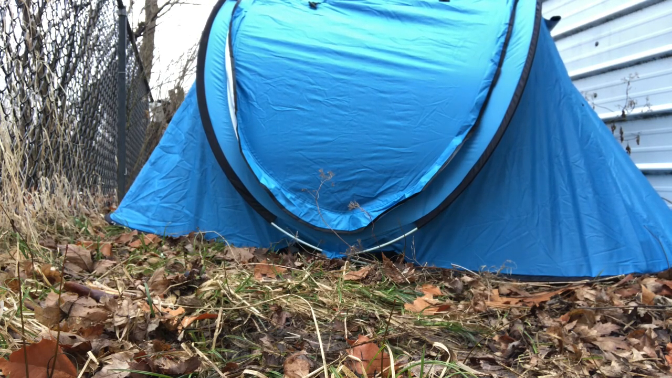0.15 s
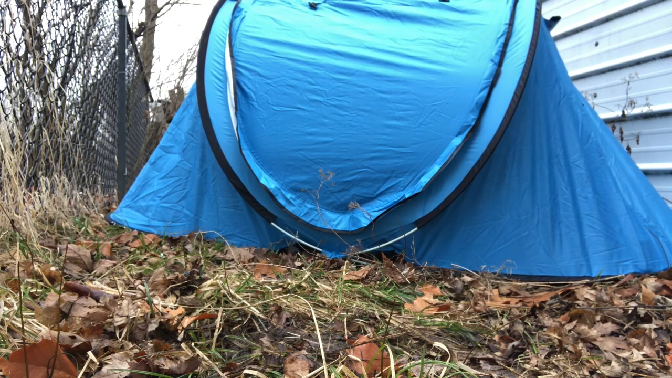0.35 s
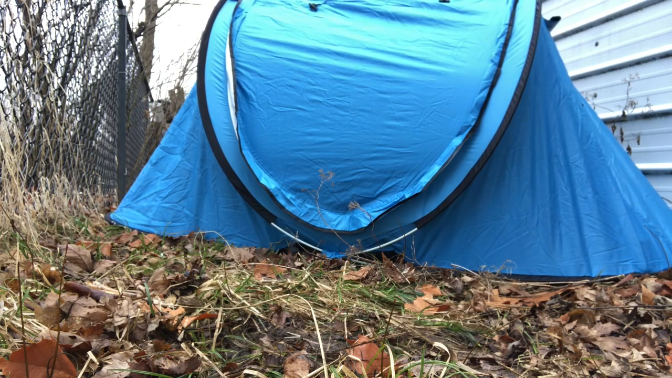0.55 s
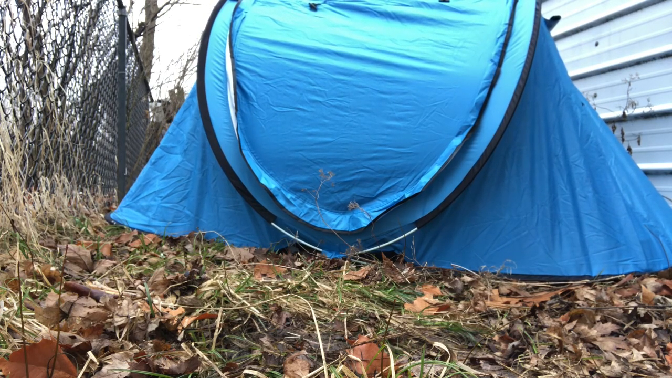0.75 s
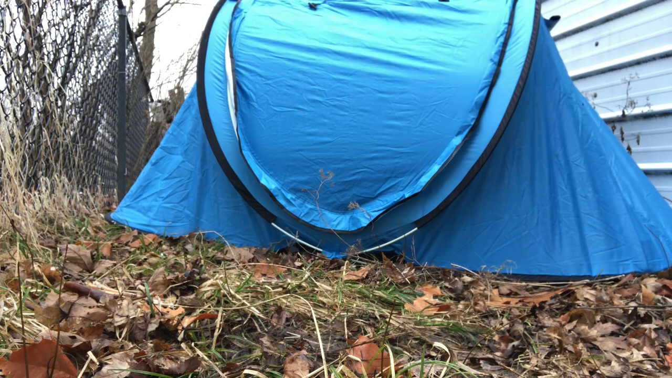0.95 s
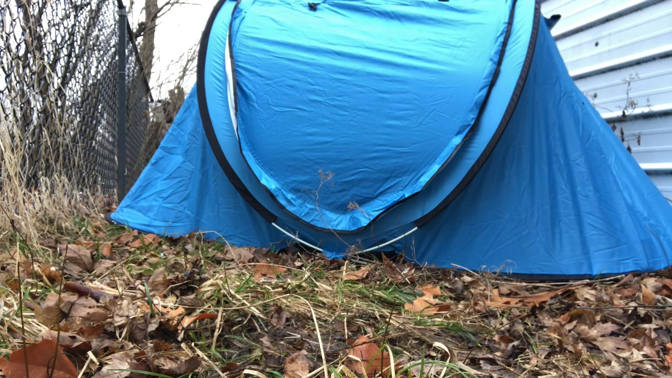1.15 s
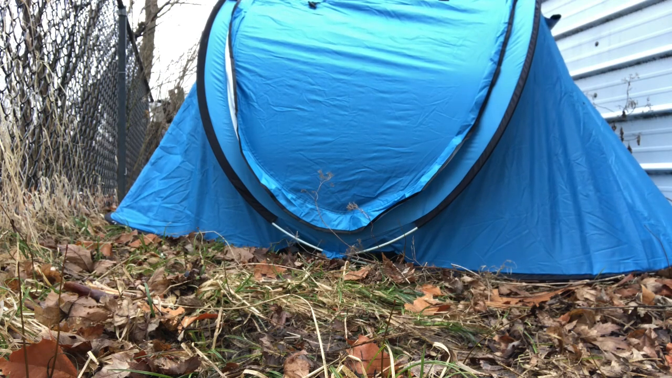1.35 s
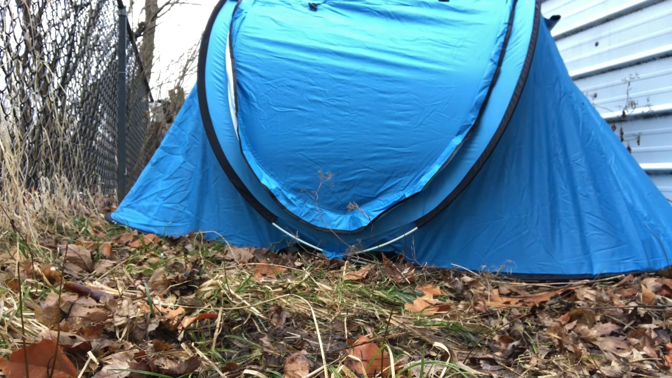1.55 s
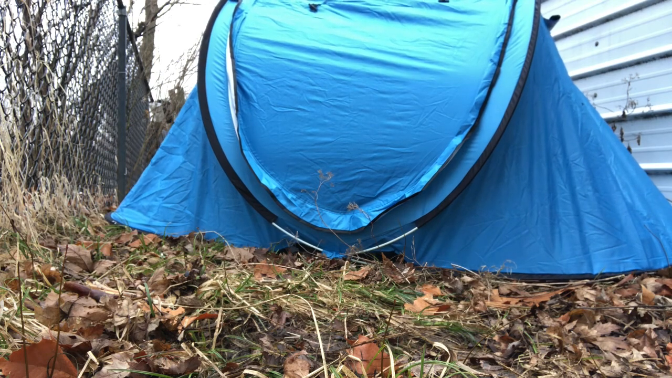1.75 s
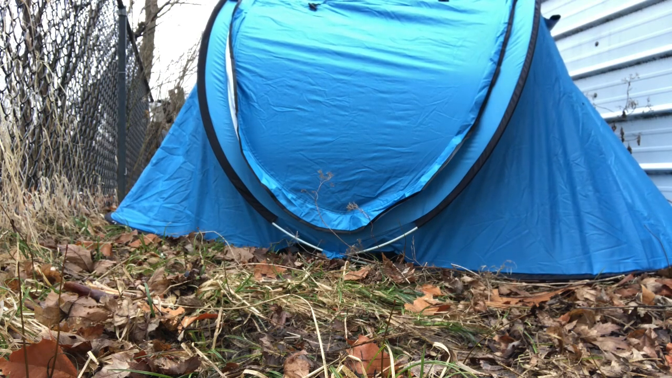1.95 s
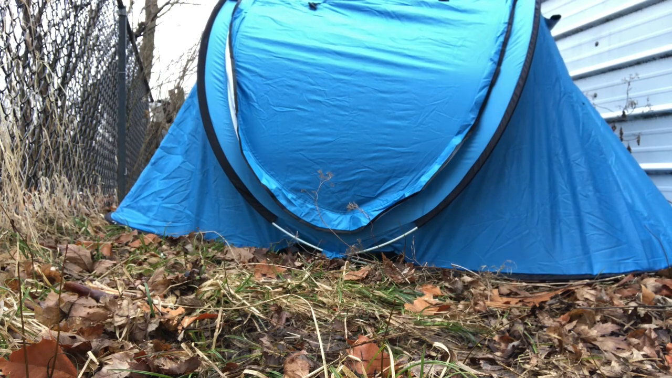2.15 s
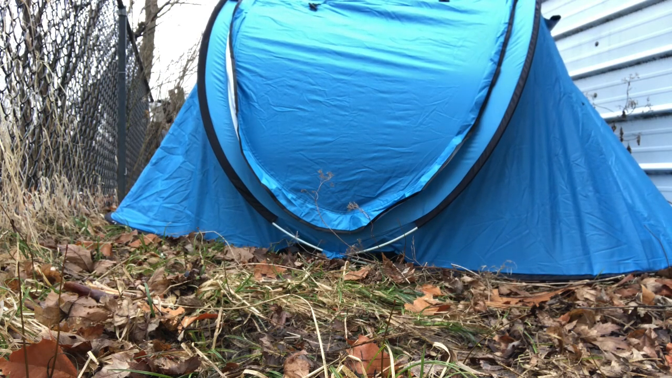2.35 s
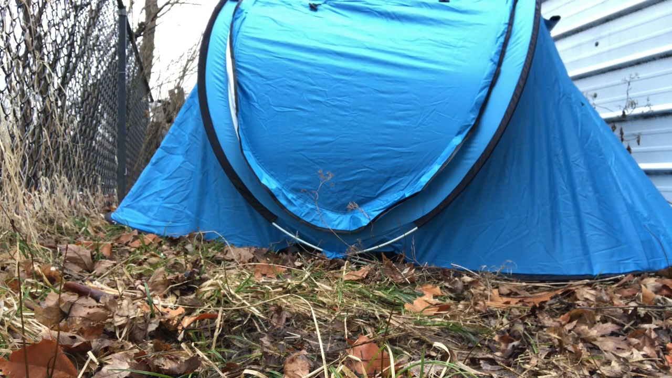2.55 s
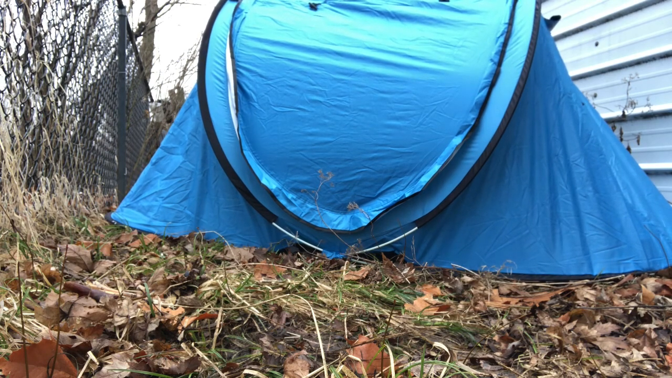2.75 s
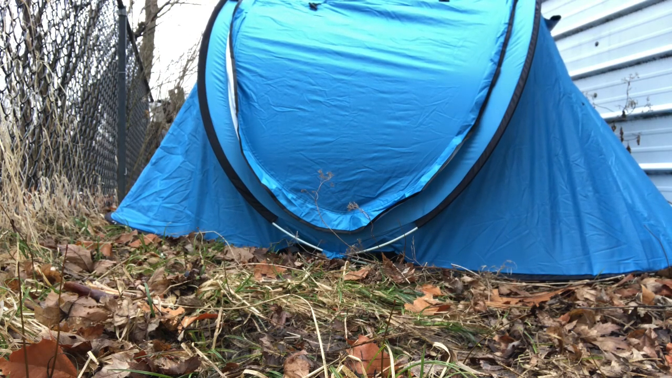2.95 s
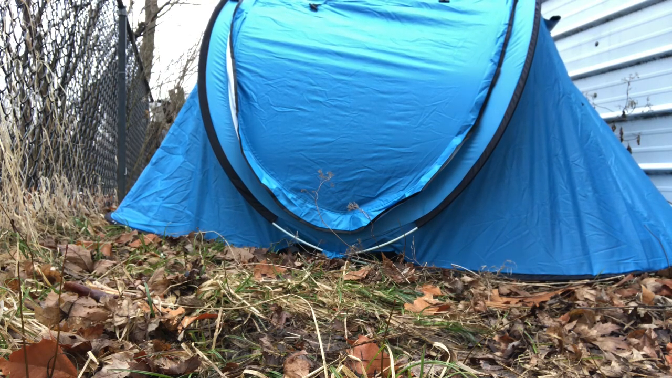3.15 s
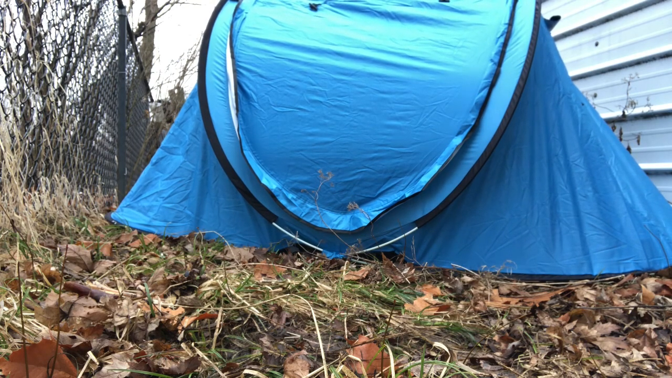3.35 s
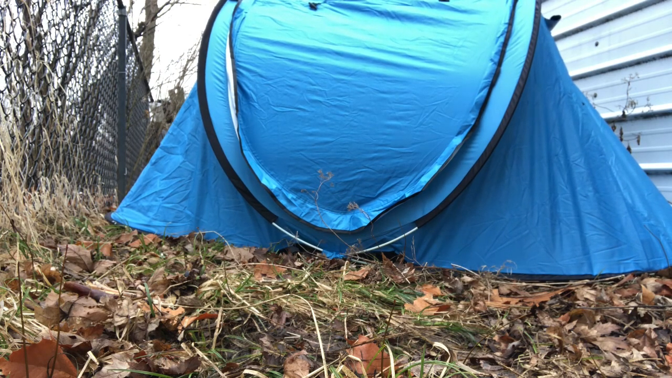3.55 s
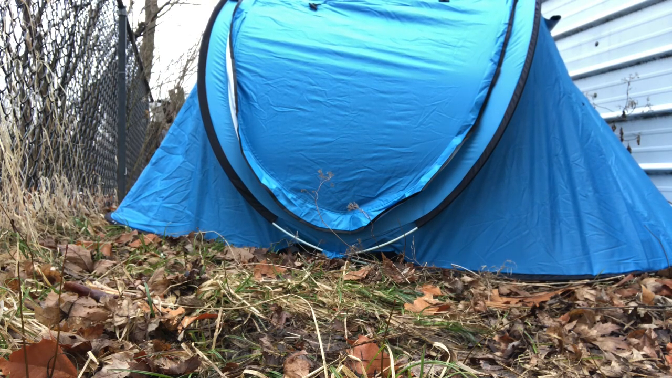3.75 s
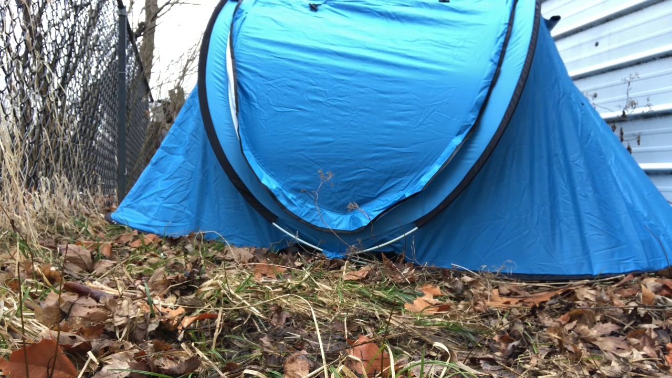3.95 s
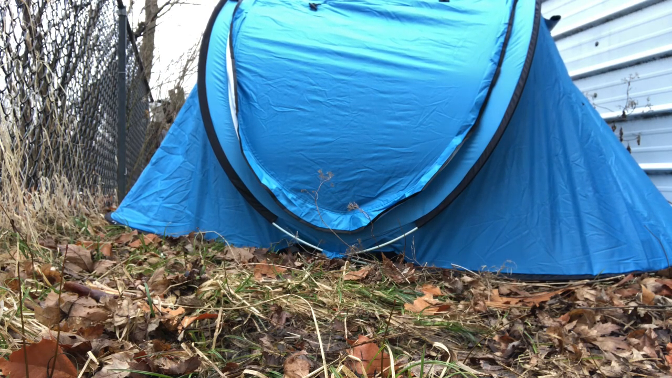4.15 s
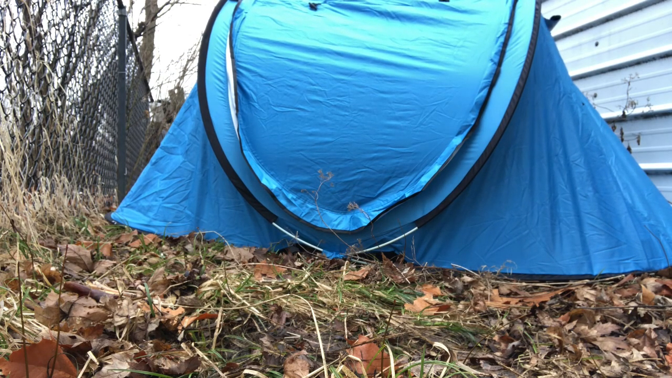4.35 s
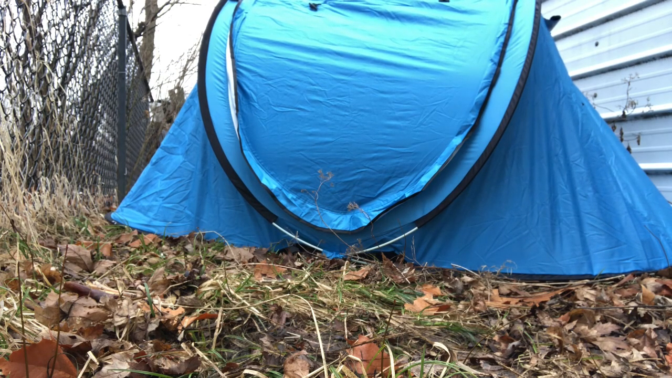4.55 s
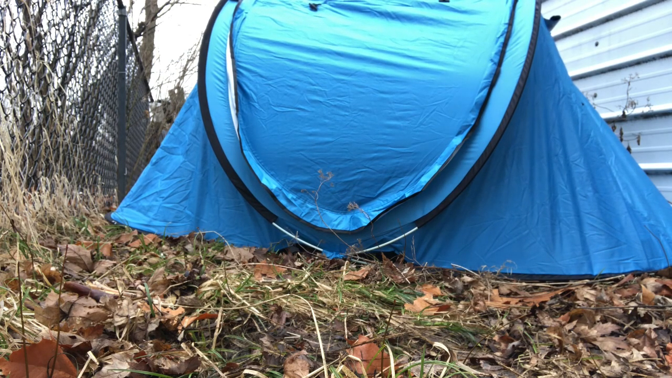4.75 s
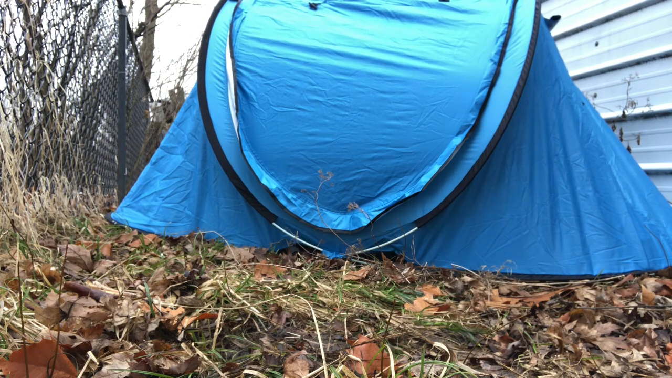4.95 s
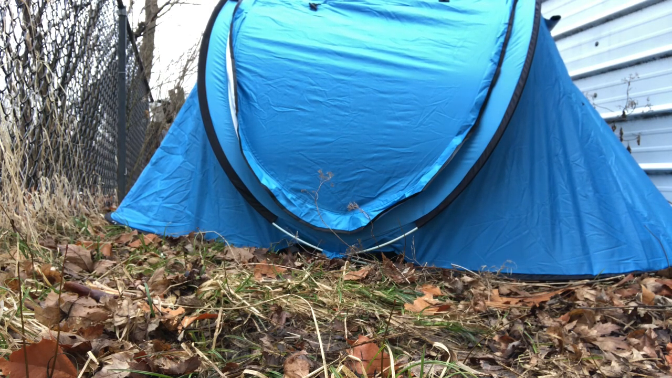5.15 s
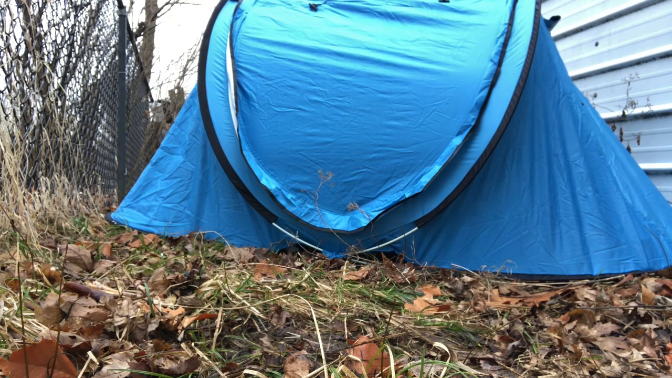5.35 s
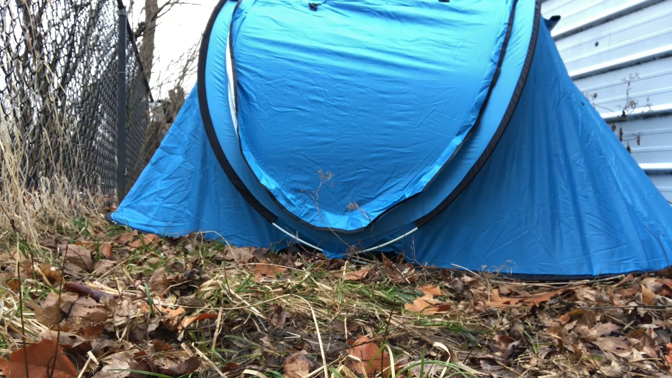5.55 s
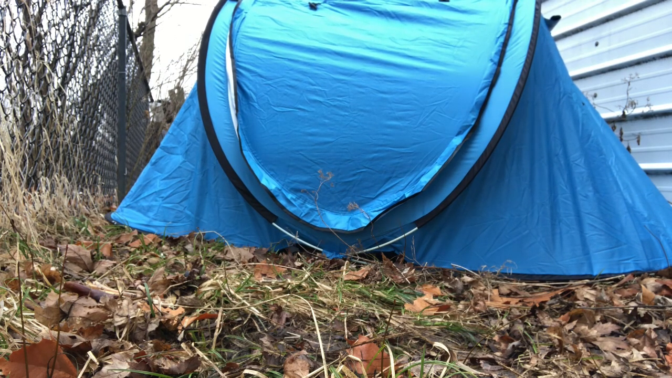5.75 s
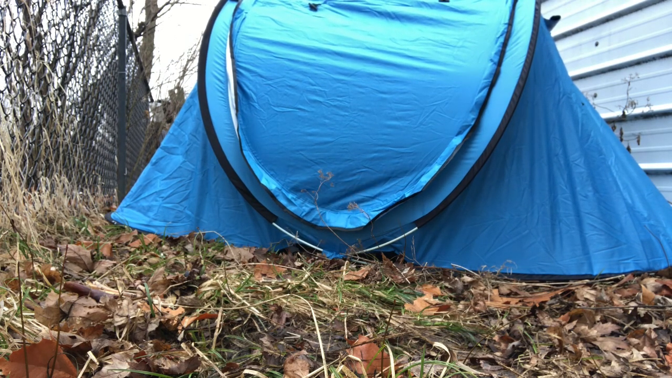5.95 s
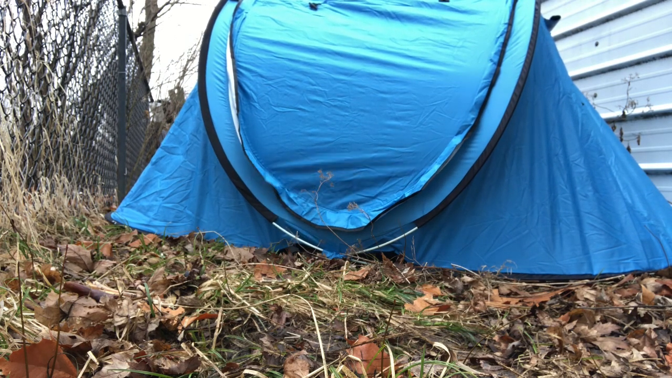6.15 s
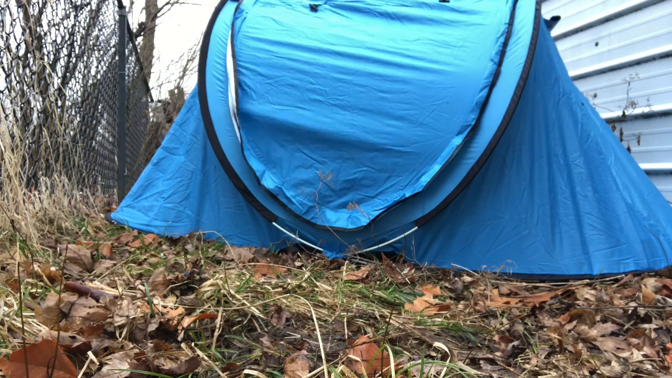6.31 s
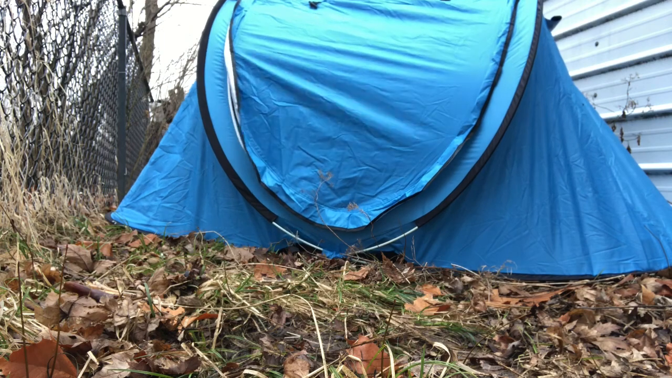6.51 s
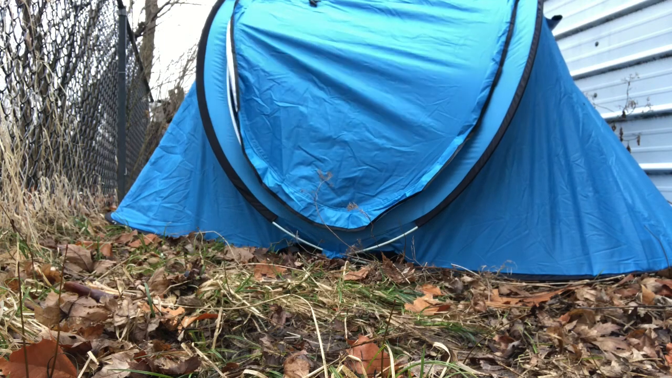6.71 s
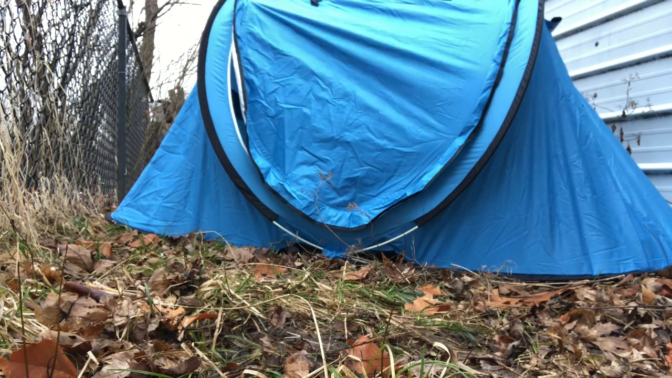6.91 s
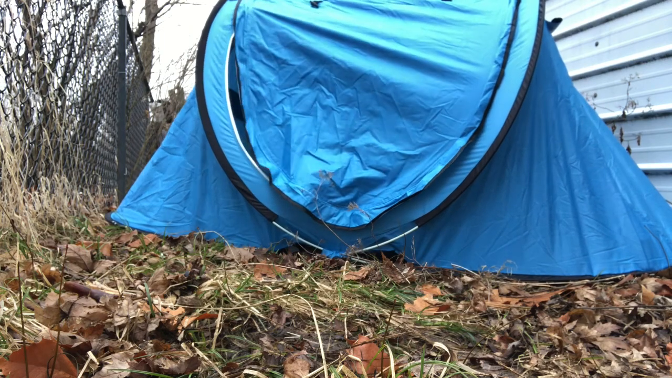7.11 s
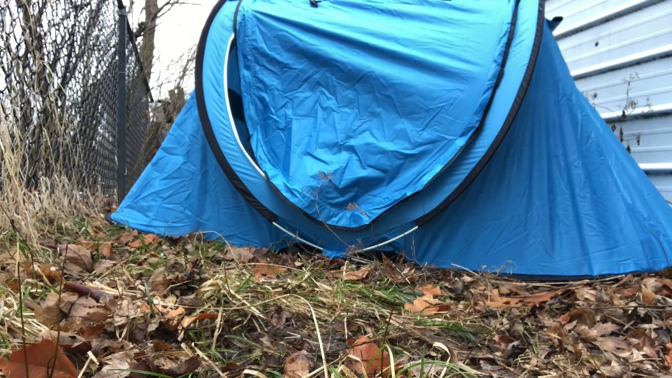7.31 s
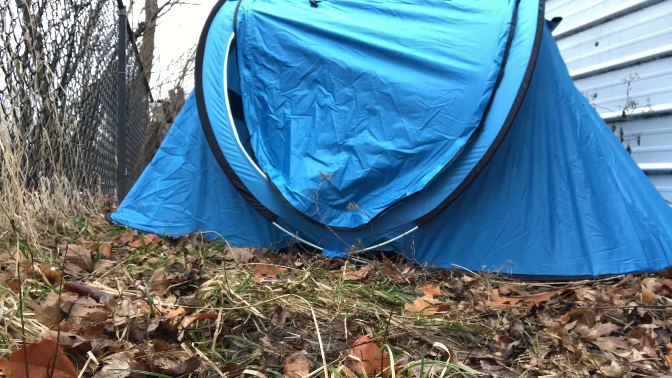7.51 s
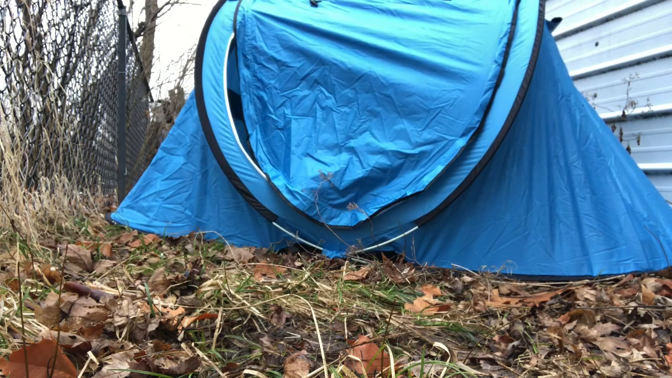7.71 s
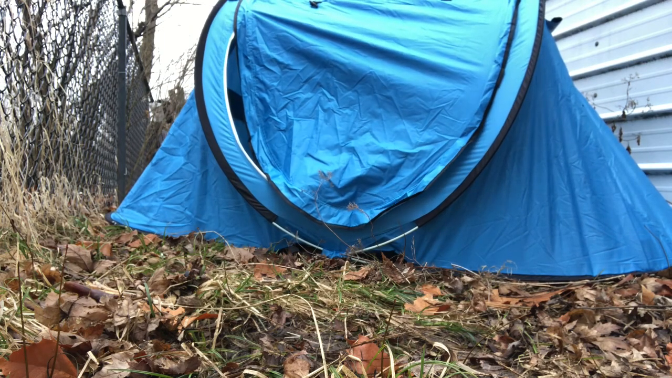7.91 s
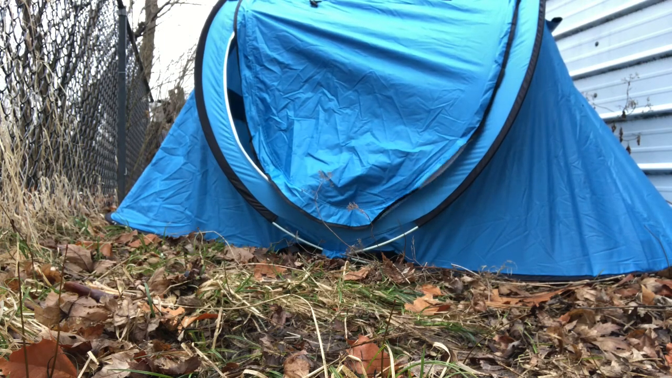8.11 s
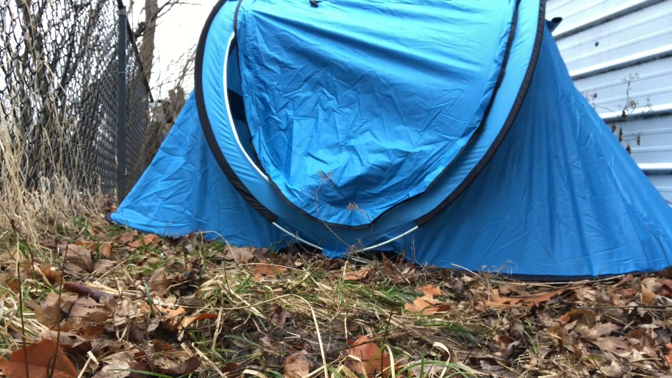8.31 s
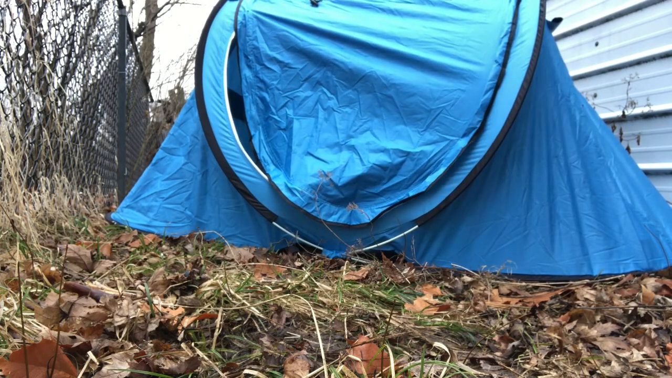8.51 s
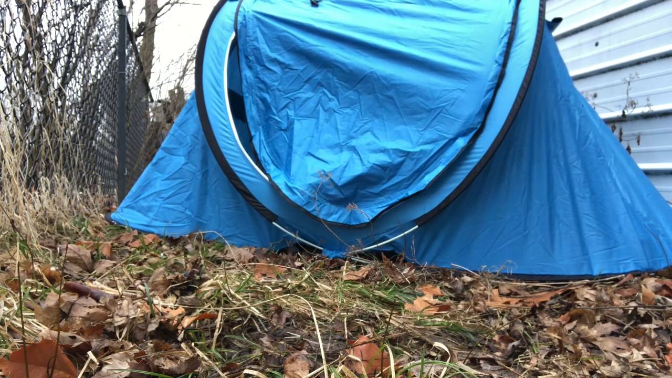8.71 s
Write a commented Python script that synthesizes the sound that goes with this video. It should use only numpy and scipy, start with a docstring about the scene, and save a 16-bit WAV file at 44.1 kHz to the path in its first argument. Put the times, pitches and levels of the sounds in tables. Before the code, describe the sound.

Taut tent cloth rustles and snaps sharply once, then a door zipper is pulled open in two buzzing strokes while a small bird trills outdoors.

```python
"""At a tent outdoors, someone rustles and knocks the taut cloth, then pulls the door zipper in two strokes.
Each passing tooth drums the cloth with low tones, snaps and gritty noise; the metal tab rings under taps.
A small bird trills in whistles and down-sweeps, and far birds chirp with gliding, burring tones.
Two distant engines drone as tones at multiples of their firing rate, over a hush of filtered noise."""
import sys
import numpy as np
from scipy import signal
from scipy.fft import rfft, irfft, next_fast_len
from scipy.io import wavfile
from scipy.ndimage import uniform_filter1d

SR = 44100
rng = np.random.default_rng(int(sys.argv[2]) if len(sys.argv) > 2 else 0)


def wav_record(signal):
    """Record a signal, one row per channel, as 16-bit PCM in the file named by sys.argv[1]."""
    frames = np.transpose(np.atleast_2d(signal))
    bounded = np.clip(frames, -1, 1)
    # unit amplitude maps onto the largest positive 16-bit level
    quanta = np.round(bounded * 32767).astype(np.int16)
    wavfile.write(sys.argv[1], SR, quanta)


N = 391166  # length of the scene in samples


def gain_of(db):
    """Turns decibels into an amplitude factor."""
    return 10 ** (np.asarray(db) / 20)


def evened(x):
    """Scales a signal to an average (rms) strength of 1."""
    return x / np.sqrt(np.mean(x ** 2) + 1e-20)


def add(mix, s, sound):
    """Mixes a sound in, starting at s seconds."""
    part = mix[max(round(s * SR), 0):][:len(sound)]
    part += sound[:len(part)]


def columns(rows):
    """Gives the start time of a table and straight lines through each other column, one value a sample."""
    s, *rest = np.transpose(rows)
    t = np.arange(s[0], s[-1], 1 / SR)
    return s[0], [np.interp(t, s, c) for c in rest]


def coloured(x, points):
    """Filters x by a curve of (f/Hz, level/dB) points, then evens it to rms 1."""
    size = next_fast_len(len(x))
    hz, db = np.transpose(points)
    f = np.fft.rfftfreq(size, 1 / SR)
    curve_db = np.interp(np.log(f + 1), np.log(hz + 1), db)
    return evened(irfft(rfft(x, size) * gain_of(curve_db), size)[:len(x)])


def drift(count, per_s):
    """Makes a smooth random wander of rms 1; a higher per_s wanders faster."""
    size = int(SR / per_s) + 1
    once = uniform_filter1d(rng.standard_normal(count), size)
    return evened(uniform_filter1d(once, size))


def taps(count, per_s, spread_db):
    """Scatters single-sample taps at random, a few of them large."""
    size = gain_of(spread_db * np.minimum(rng.exponential(1, count), 5))
    sign = rng.choice([-1., 1.], count)
    return size * sign * (rng.random(count) < per_s / SR)


def scattered(x, t60, wet_db):
    """Smears a sound with a fading noise echo, as its surroundings do; t60 is its 60 dB fade in s."""
    t = np.arange(SR // 2) / SR
    tail = rng.standard_normal(len(t)) * gain_of(-60 * t / t60)
    return x + gain_of(wet_db) * signal.oaconvolve(x, tail / np.linalg.norm(tail))[:N]


# tone colour of the outdoor hush: (f/Hz, relative level/dB)
HUSH_COLOUR = [(22, -19), (82, -5), (124, -6), (168, -13), (209, -11), (315, -17), (420, -22.5),
               (644, -24.5), (1060, -27.5), (2280, -31), (7620, -37.5), (15600, -49)]
HUSH_DB = -61


def hush():
    """Filtered noise makes the outdoor hiss and far traffic, with a slight slow sway in level."""
    level_db = HUSH_DB + 0.8 * drift(count=N, per_s=2)
    return gain_of(level_db) * coloured(rng.standard_normal(N), HUSH_COLOUR)


# engine whose firing rate falls: (t/s, firing f/Hz, level/dB)
ENGINE_SLOWING = [(0, 119.2, -64.5), (1, 117.6, -60), (1.7, 105.8, -66.5), (2.85, 91.5, -66),
                  (3.2, 83, -68), (3.9, 79.4, -64)]
# engine whose firing rate climbs: (t/s, firing f/Hz, level/dB, second order level/dB, third order level/dB)
ENGINE_PULLING = [(5.02, 53.8, -69, -79, -68), (5.199, 61.9, -61, -57, -62.5),
                  (5.45, 65.2, -66.5, -61.5, -64.5), (6.1, 67.1, -67, -67, -66),
                  (6.749, 72.23, -55.5, -60.5, -65.5), (8.96, 78, -62.5, -58, -72)]


def engine(rows):
    """Regular firing gives tones at whole multiples of its rate; pitch and levels waver at random."""
    s, (hz, *orders_db) = columns(rows)
    n = len(hz)
    turns = np.cumsum(hz * (1 + 0.0052 * drift(count=n, per_s=17))) / SR
    drone = np.zeros(n)
    for order, db in enumerate(orders_db, start=1):
        level = gain_of(db + 3.7 * drift(count=n, per_s=4.4))
        drone += level * np.sin(2 * np.pi * order * turns)
    return s, np.sqrt(2) * drone * signal.windows.tukey(n, .04)


# far chirps: (t/s, level/dB before the burr, length/s, start f/Hz, middle f/Hz, end f/Hz)
CHIRPS = [(0.71, -71.5, 0.14, 3200, 3420, 2700), (2.498, -70, 0.2, 3250, 3500, 2540),
          (4.221, -71, 0.048, 4730, 4700, 4000), (4.513, -69, 0.15, 3300, 3560, 2640),
          (3.27, -73, 0.088, 3400, 4370, 3300)]
# twittering of a distant flock: (t/s, length/s, level/dB of each chirp before the burr)
CHATTER = [(2.3, 1.25, -84), (4.9, .8, -83)]


def far_birds():
    """Each chirp is one gliding whistle with a 95 Hz burr; a flock crowds many short ones together."""
    out = np.zeros(N)
    chatter = []
    for start, length, db in CHATTER:
        for place, hz in rng.uniform([0, 3300], [1, 5800], (round(70 * length), 2)):  # 70 chirps a second
            chatter.append((start + length * place, db, .05, hz, hz + 300, hz - 500))
    for s, db, length, start_hz, middle_hz, end_hz in CHIRPS + chatter:
        u = np.linspace(0, 1, round(length * SR))  # progress through the chirp
        glide_hz = np.interp(u, [0, .55, 1], [start_hz, middle_hz, end_hz])
        hz = glide_hz * (1 + 0.0261 * drift(count=len(u), per_s=165))
        whistle = np.sin(2 * np.pi * np.cumsum(hz) / SR) * np.sin(np.pi * u ** 1.23)
        burr = 1 + np.sin(2 * np.pi * 95 * length * u)
        add(out, s, gain_of(db) * burr * whistle)
    return scattered(out, t60=.35, wet_db=8)


# the trill slows as it runs, one row a phrase; the two parts of a syllable sit around its level:
# (t/s, syllables, first gap/s, last gap/s, first level/dB, last level/dB)
TRILL = [(-.010, 7, .077, .084, -60, -66), (1.78, 21, .0737, .086, -64, -63.5),
         (5.074, 12, .071, .0796, -62.5, -55)]


def trilling_bird():
    """Each syllable is an arched whistle, then a steep sweep falling from 7300 to 3500 Hz."""
    out = np.zeros(N)
    t = np.arange(round(0.034 * SR)) / SR
    u = np.linspace(0, 1, round(0.0091 * SR))
    sweep_hz = 7300 - 3800 * u ** 1.55
    sweep = np.sin(2 * np.pi * np.cumsum(sweep_hz) / SR) * np.sin(np.pi * u ** 0.98) ** 2
    arch_hz = 5040 + 170 * np.sin(np.pi * (t / t[-1]) ** 0.7)
    for start, count, first_gap, last_gap, first_db, last_db in TRILL:
        gaps = first_gap + (last_gap - first_gap) * np.linspace(0, 1, count - 1) ** 2
        times = start + np.r_[0, np.cumsum(gaps)]
        for s, db in zip(times, np.linspace(first_db, last_db, count)):
            slip, sway = rng.standard_normal(2)  # each syllable varies in pitch and level
            whistle = np.sin(2 * np.pi * np.cumsum(arch_hz * (1 + .007 * slip)) / SR)
            whistle_db = db - 5 + 2.2 * sway + 2.5 * drift(count=len(t), per_s=150)
            add(out, s - .002, gain_of(whistle_db) * whistle * signal.windows.tukey(len(t), .4))
            add(out, s + 0.039, gain_of(db + 3.0) * sweep)
    return scattered(out, t60=.15, wet_db=-9)


# rustling of the cloth, one table a bout: (t/s, level/dB before a 7 dB lift)
RUSTLE = [
    [(0, -72), (.35, -64), (.55, -66), (.95, -64.5), (1.2, -66), (1.32, -60), (1.52, -72.5), (1.75, -67),
     (1.9, -74), (2.08, -64), (2.45, -83), (3.1, -76), (3.6, -93)],
    [(4.46, -75), (4.52, -64), (4.75, -98)],
    [(5.05, -74), (5.2, -71), (5.72, -79)],
    [(6.94, -67.5), (7.3, -75.5), (7.52, -71), (7.63, -75)],
]
# tone colour of the rustle: (f/Hz, relative level/dB)
RUSTLE_COLOUR = [(200, 2), (400, 1.5), (700, -1.5), (1500, -6.5), (3000, -13.5), (6000, -18), (12000, -69)]


def rustle():
    """Nylon crackles as clumps of short noise bursts and rubs as unsteady noise."""
    out = np.zeros(N)
    for rows in RUSTLE:
        s, (db,) = columns(rows)
        n = len(db)
        clumps = signal.lfilter([1], [1, -.93], taps(count=n, per_s=540, spread_db=5.0))  # each tap dies away
        crackle = evened(clumps * rng.standard_normal(n))
        rub_db = 2.4 * drift(count=n, per_s=150) + 1.4 * drift(count=n, per_s=53)
        rub = rng.standard_normal(n) * gain_of(rub_db)
        sound = coloured(0.69 * crackle + rub, RUSTLE_COLOUR)
        add(out, s, gain_of(db + 7.0) * sound * signal.windows.tukey(n, .05))
    return out


# knocks and snaps of the cloth: (t/s, thump peak level/dB, crack level/dB against the thump, decay time/ms)
KNOCKS = [(0.081, -48.5, 3, 8.8), (0.277, -58.5, 10, 11), (0.322, -60, 11, 3.3), (0.355, -50.5, 5, 12),
          (0.428, -43.5, 8, 8.9), (0.618, -37, -2.5, 2.8), (0.967, -54, 6, 3.5), (1.061, -46, -18, 2.8),
          (1.268, -42.5, -3, 11), (1.281, -52.5, 13, 20), (1.349, -44, 2.5, 27), (1.377, -41, 1, 6.1),
          (1.387, -20, -8, 7.1), (1.391, -18, -4, 1.8), (1.405, -28.5, -10, 4), (1.628, -34.5, -10.5, 4.6),
          (1.685, -35, -3.5, 7.5), (1.967, -47, -2.5, 5.6), (2.156, -57.5, 12, 6.6), (2.344, -56, 2, 2.49),
          (7.07, -49.5, -4, 3.9), (7.398, -50, -16, 3.5), (7.503, -48, -7, 1.86), (7.528, -48, -2, 4.5),
          (7.621, -55, -3, 3)]
# tone colour of the taut cloth's thump: (f/Hz, relative level/dB)
CLOTH = [(120, -49), (260, -11), (350, 5.5), (520, 9.5), (700, 6), (950, -0.5), (1250, -14), (2200, -66)]
# tone colour of the weave's crack: (f/Hz, relative level/dB)
SNAP = [(400, -20), (1300, 5), (2500, 2.5), (4500, -2.5), (7000, -16), (13000, -33)]


def knocks():
    """A dry noise burst thumps the cloth low and cracks high; short knocks also snap with a falling tone."""
    out = np.zeros(N)
    t = np.arange(4096) / SR - .01  # the hit falls at t = 0
    flick_hz = (t > 0) * (700 + 2800 * np.exp(-abs(t) / 0.00138))  # the treble of a snap arrives first
    flick = np.cos(2 * np.pi * np.cumsum(flick_hz) / SR)
    for s, db, crack_db, ms in KNOCKS:
        low, high = rng.standard_normal((2, 4096))
        push = (t > 0) * (np.exp(-t * 1000 / ms) + 0.1 * np.exp(-t / 0.018))
        sharp = np.clip((7.5 - ms) / 2.5, 0, 1.3)  # short knocks snap, long ones crackle
        grain = evened(high * abs(high)) * np.clip(t * 2500 / ms, 0, 1)
        thump = coloured(low * push * np.clip(t / 0.00068, 0, 1), CLOTH)
        crack = coloured((grain + sharp * flick) * push, SNAP)
        sound = thump / abs(thump).max() + gain_of(crack_db) * crack / abs(crack).max()
        add(out, s - .011, gain_of(db) * sound)
    return out


def ring(modes, shift):
    """Metal rings at several pitches after one tap, each dying at its own pace; shift scales the pitches."""
    t = np.arange(SR // 8) / SR
    tones = sum(gain_of(db - 60 * t / t60) * np.sin(2 * np.pi * hz * shift * t) for hz, db, t60 in modes)
    return (1 - np.exp(-t / 0.0007)) * tones


# ringing tones of the pull tab, before the grip shifts them: (f/Hz, relative level/dB, 60 dB fade/s)
TAB = [(4200, -20, .03), (10600, 0, .045), (11200, -15, .02), (13700, -7.5, .04)]
# the loose tab ticks against the slider: (t/s, level/dB before a 2 dB lift)
TICKS = [(5.1682, -61), (5.2076, -62), (5.371, -54.5), (5.4383, -56), (7.5272, -60), (7.5443, -61)]


def tab_ticks():
    """A sharp contact rings the tab, and the fingers damp it within a few milliseconds."""
    out = np.zeros(N)
    tick = ring(TAB[1:], 1.07) * np.exp(-np.arange(SR // 8) / SR / 0.0023)
    tick[0] = 5.2  # the sharp contact itself
    for s, db in TICKS:
        add(out, s, gain_of(db + 2.0) * tick)
    return out


# the tab swings free and jingles in bursts: (middle t/s, peak level/dB before a 3 dB lift, length/s)
JINGLES = [(5.835, -71, 0.29), (6.519, -88, 0.2), (7.741, -59, 0.019), (7.897, -59, 0.072),
           (8.072, -60.5, 0.065), (8.217, -56.5, 0.11), (8.346, -55.5, 0.1), (8.6, -72, 0.38)]
JINGLE_DB = -27  # steady rattle of the tab against the slider level, before the same lift


def tab_jingle(t, scrape_db, grip):
    """Random taps ring the tab, softly all through the stroke and louder in bursts."""
    n = len(t)
    swing = gain_of(scrape_db + JINGLE_DB)
    for middle, db, length in JINGLES:
        swing += gain_of(db) * np.exp(-(2 * (t - middle) / length) ** 2)
    rattle = taps(count=n, per_s=300, spread_db=2.5)
    jingle = np.zeros(n)
    for mode in TAB:
        uneven_rattle = rattle * gain_of(5 * drift(count=n, per_s=15))
        jingle += signal.oaconvolve(uneven_rattle, ring([mode], grip))[:n]
    return np.sqrt(2) * swing * evened(jingle)


# squeaks of the slider: (t/s, peak level/dB, f/Hz, length/s)
SQUEAKS = [(7.978, -46.5, 6030, 0.03), (8.3, -54.5, 4213, 0.17)]


def squeaks():
    """The slider squeaks as a wobbling pure tone that swells and fades."""
    out = np.zeros(N)
    for s, db, hz, length in SQUEAKS:
        t = np.arange(0, length, 1 / SR)
        wobble = 1 + .008 * drift(count=len(t), per_s=100)
        tone = np.sin(2 * np.pi * hz * np.cumsum(wobble) / SR)
        add(out, s, gain_of(db) * tone * np.hanning(len(t)))
    return out


# slider speed and cloth drumming, one table a stroke:
# (t/s, tooth rate f/Hz, drum level/dB, level/dB of the octave above)
STROKES = [
    [(5.705, 87, -57, -59), (5.87, 273, -57.5, -59), (5.975, 420, -45, -60), (6.07, 563, -55.5, -47.5),
     (6.125, 558, -49.5, -56), (6.2, 716, -58, -52), (6.27, 804, -44, -46.5), (6.34, 753, -37, -51),
     (6.4, 695, -31.5, -54), (6.45, 527, -52, -54), (6.5, 467, -42, -53), (6.57, 310, -47, -50),
     (6.65, 362, -40, -47), (6.75, 326, -42, -49), (6.82, 443, -41.5, -55), (6.89, 402, -40, -57),
     (6.95, 140, -56, -49)],
    [(7.612, 62, -49, -67), (7.67, 120, -64, -53), (7.71, 205, -54, -51), (7.81, 250, -47.5, -48.5),
     (7.85, 191, -44, -47), (7.92, 222, -44.5, -50), (7.97, 199, -40, -74), (8.01, 267, -47, -65),
     (8.14, 284, -47.5, -59), (8.2, 210, -45, -53.5), (8.3, 89, -63, -52.5), (8.4, 145, -51, -62.5),
     (8.47, 212, -48, -48.5), (8.53, 303, -45, -72), (8.65, 356, -52, -58), (8.75, 354, -44, -63),
     (8.89, 440, -42, -57)],
]
# scrape, one table a stroke:
# (t/s, slider level/dB, cloth level/dB, treble lift level/dB, lift level/dB around 2 kHz)
SCRAPE_LEVELS = [
    [(5.705, -56.5, -55.5, -3, -11), (5.95, -50.5, -51, 0.5, -5), (6.2, -51, -54.5, 5, 6.5),
     (6.38, -61, -52.5, 18, 6.5), (6.46, -56.5, -47.5, 1.5, -3), (6.6, -57.5, -48.5, -5, -8),
     (6.88, -55, -49.5, 4, -7), (6.95, -64, -58, 4, -1)],
    [(7.612, -57.5, -52.5, -2, 6), (7.73, -55, -48, 13.5, -2), (7.85, -55.5, -51.5, 1.5, -0.5),
     (8.08, -54.5, -52.5, 7.5, 1.5), (8.2, -65, -56, 5, 0), (8.33, -54.5, -56, -11, 1),
     (8.5, -60, -52, 6, 9.5), (8.65, -58, -55.5, 8.5, 6.5), (8.89, -58, -53.5, 8.5, 5.5)],
]
# how the fingers hold the tab shifts its pitches: one factor a stroke
TAB_GRIP = [0.98, 1.001]
# tone colour of the slider on the tape: (f/Hz, relative level/dB)
SCRAPE = [(1180, -31), (1900, -18.5), (2400, -0.5), (4180, 2), (8980, -16.5), (10900, -15.5), (14000, -20),
          (15600, -24)]
# tone colour of the cloth under the scrape: (f/Hz, relative level/dB)
SCRAPE_BODY = [(150, -5), (450, 4.5), (1000, -4), (1750, -6), (2300, -19), (7000, -41)]


def zipper_stroke(pull, levels, grip):
    """Each tooth thumps the cloth, snaps and scrapes briefly, so the pitch follows the slider's speed."""
    s, (hz, drum_db, octave_db) = columns(pull)
    n = len(hz)
    t = s + np.arange(n) / SR
    at, *rest = np.transpose(levels)
    scrape_db, body_db, treble_db, middle_db = [np.interp(t, at, c) for c in rest]

    turns = np.cumsum(hz * (1 + 0.019 * drift(count=n, per_s=160))) / SR  # teeth passed, unevenly
    drum = gain_of(drum_db + 1.6 * drift(count=n, per_s=90)) * np.cos(2 * np.pi * turns)
    drum += gain_of(octave_db + 1.5 * drift(count=n, per_s=60)) * np.cos(4 * np.pi * turns - 1)

    snaps = np.zeros(n)
    for k in range(3, 20):  # higher multiples of the tooth rate, faded out from 3500 to 6500 Hz
        fade = np.clip((6500 - k * hz) / 3000, 0, 1)
        snaps += np.cos(2 * np.pi * k * turns - k) * fade * gain_of(4 * drift(count=n, per_s=50))
    # fast teeth snap in step, so their snaps stand out more
    snaps *= (hz / 800) ** .9 / np.sqrt(uniform_filter1d(snaps ** 2, 2000))

    tooth = gain_of(1.6 * rng.standard_normal(2000))[turns.astype(int)]  # each tooth has its own strength
    since = turns % 1 / hz  # seconds since the last tooth
    grit = (0.11 + tooth * np.exp(-since / 0.0035)) * rng.standard_normal(n)
    grit /= np.sqrt(uniform_filter1d(grit ** 2, 4000))

    uneven = gain_of(1.0 * drift(count=n, per_s=33))
    rasp = coloured(uneven * (grit + .75 * snaps), SCRAPE)
    treble = signal.butter(2, 6500, "high", fs=SR, output="sos")
    fizz = signal.sosfiltfilt(treble, rasp)
    rasp += fizz * (gain_of(treble_db + 2.9 * drift(count=n, per_s=42)) - 1)
    body = coloured(uneven * (grit + 1.2 * snaps), SCRAPE_BODY)
    scrape = gain_of(scrape_db) * rasp + gain_of(body_db) * body
    band = signal.butter(2, [1850, 2550], "band", fs=SR, output="sos")
    scrape += signal.sosfiltfilt(band, scrape) * (gain_of(middle_db) - 1)

    sound = np.sqrt(2) * drum + scrape + tab_jingle(t, scrape_db, grip)
    return s, sound * signal.windows.tukey(n, .006)


def scene():
    """Mixes the far sounds with the tent sounds, which get a short echo, into one channel."""
    far = hush() + far_birds() + trilling_bird()
    for rows in (ENGINE_SLOWING, ENGINE_PULLING):
        add(far, *engine(rows))
    tent = rustle() + knocks() + tab_ticks() + squeaks()
    for pull, levels, grip in zip(STROKES, SCRAPE_LEVELS, TAB_GRIP):
        add(tent, *zipper_stroke(pull, levels, grip))
    return (scattered(tent, t60=0.1, wet_db=-8.0) + far)[None]


EDGE_HZ = 15750  # upper band limit


def record(dry):
    """The microphone drops the deepest bass and the recorder cuts the highest treble."""
    bass_cut = signal.butter(3, 45, "high", fs=SR, output="sos")
    lean = signal.sosfilt(bass_cut, dry)
    treble_cut = signal.firwin(511, EDGE_HZ, window=("kaiser", 9), fs=SR)
    return signal.oaconvolve(lean, treble_cut[None], "same")


dry = scene()
out = record(dry)
wav_record(out)
```